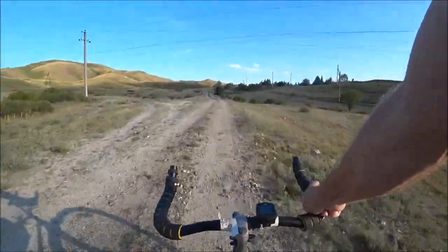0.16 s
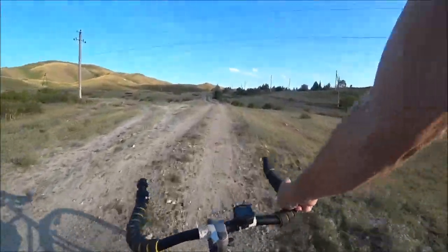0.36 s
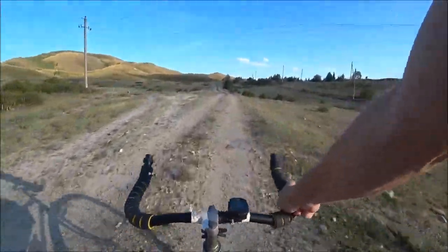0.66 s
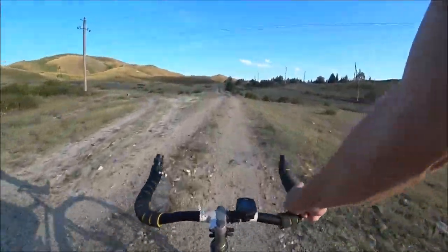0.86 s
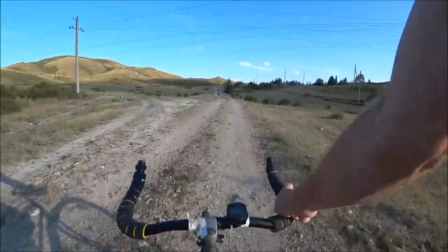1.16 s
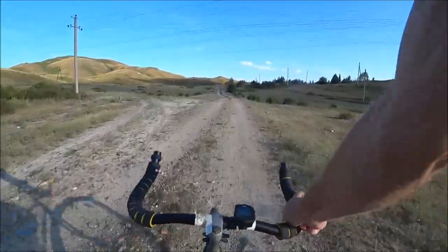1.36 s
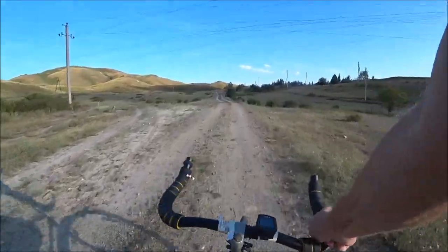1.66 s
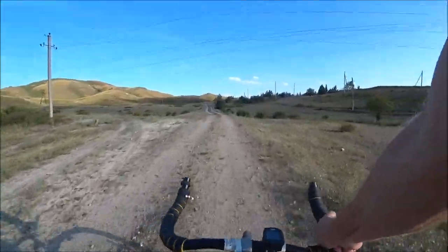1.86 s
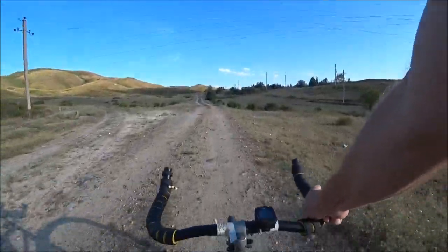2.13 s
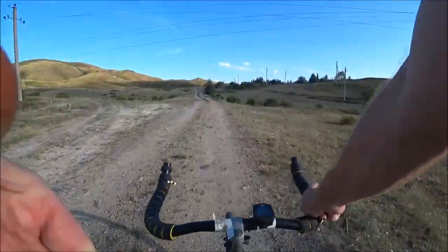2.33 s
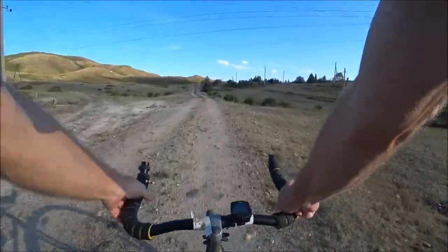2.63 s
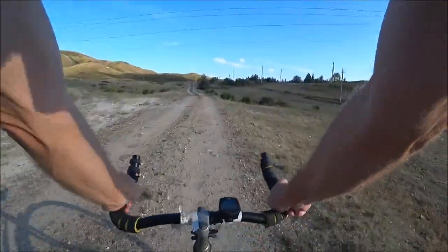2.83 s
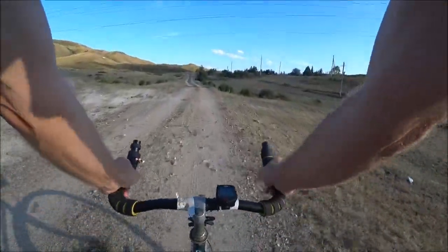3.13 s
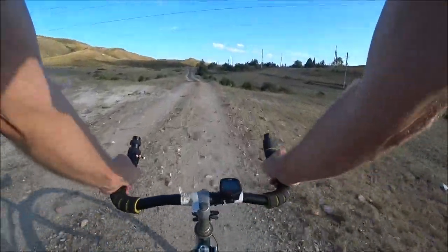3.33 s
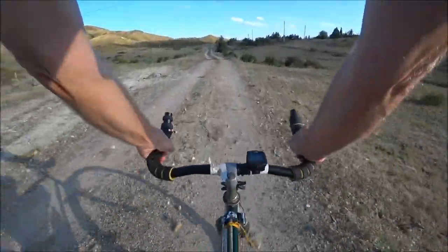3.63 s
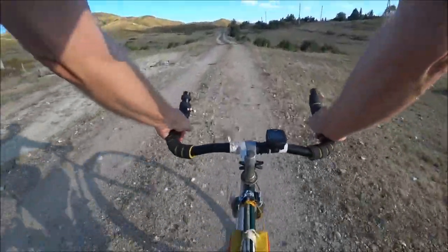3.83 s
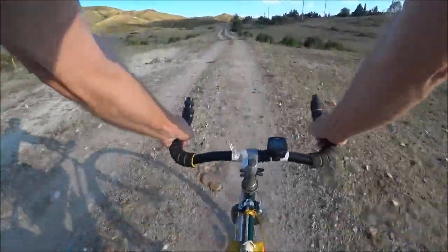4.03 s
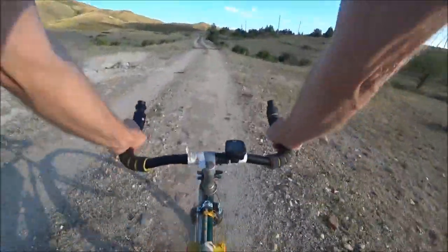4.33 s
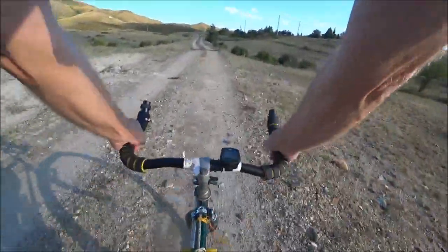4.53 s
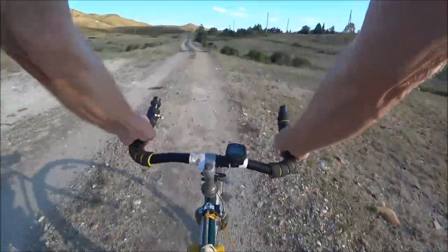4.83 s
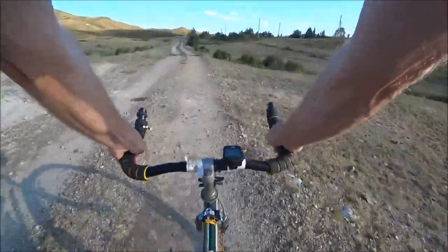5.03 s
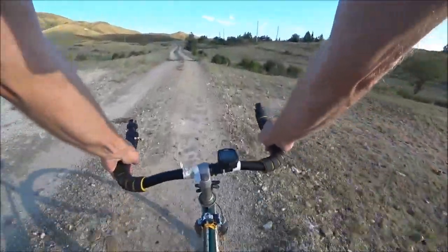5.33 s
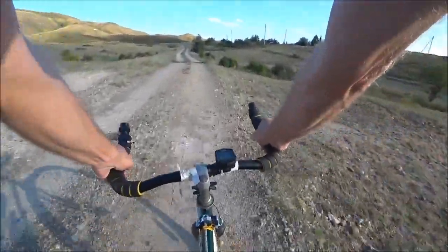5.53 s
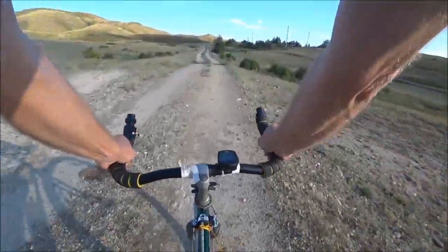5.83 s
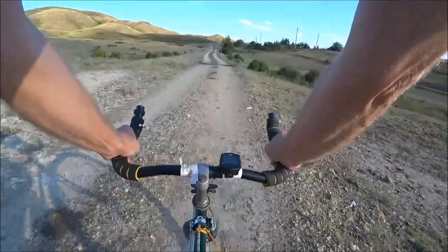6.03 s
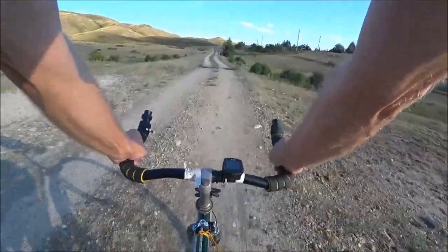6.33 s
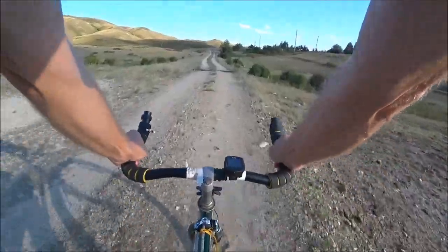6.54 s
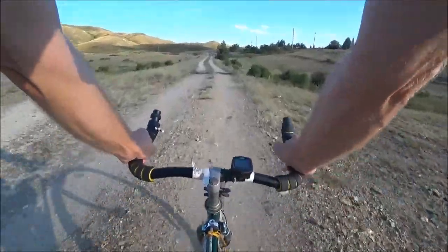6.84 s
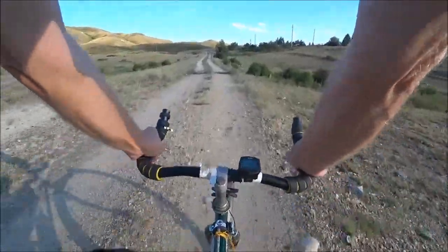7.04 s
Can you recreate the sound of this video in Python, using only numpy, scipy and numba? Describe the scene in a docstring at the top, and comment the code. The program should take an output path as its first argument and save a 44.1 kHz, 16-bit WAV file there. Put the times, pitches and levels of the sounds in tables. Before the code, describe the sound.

Bicycle tyres crunch slowly over a gravel track with sharp stone snaps and frame knocks, while wind gusts buffet the microphone harder later on.

```python
"""A slow bicycle on gravel

A bicycle rolls slowly along a gravel track, heard from a small two-port microphone on the rider's chest.
Stones crunch (filtered grains and hiss) and snap (short rings with a crack of noise) under the tyres.
Bumps knock through the frame (dying tones and noise), and short squeaks (rough tones) come and go.
Gusts of wind buffet the two ports (noise through moving low-passes, with pulses) over a deep rumble."""
import sys
import numpy as np
from scipy import signal
from scipy.fft import rfft, irfft, next_fast_len
from scipy.io import wavfile
from scipy.ndimage import uniform_filter1d
from numba import njit

SR = 44100
rng = np.random.default_rng(int(sys.argv[2]) if len(sys.argv) > 2 else 0)


def digitize_waveform(pressure):
    """Quantize a signal to 16-bit integers and store it at the path in sys.argv[1].

    Rows of a 2-D input are taken as channels; values are limited to [-1, 1].
    """
    field = np.atleast_2d(pressure).T
    bounded = np.clip(field, -1, 1)
    quanta = np.round(bounded * 32767).astype(np.int16)
    wavfile.write(sys.argv[1], SR, quanta)


N = 317072

# Colour of stones through the microphone housing: pitch_hz, gain_db (only the shape matters for the crunch)
STONE_COLOUR = [(88, -43.5), (150, 6.5), (232, -9.5), (322, 1.5), (400, -1.5), (689, -9), (1430, -8),
                (1740, -6), (2160, -8), (2410, -5), (3170, -0.5), (4720, -13.5), (6090, -14.5),
                (10500, -29.5), (11500, -27.5), (15000, -117), (22000, -120)]


def amp(db):
    """Turns decibels into a plain factor."""
    return 10 ** (np.asarray(db) / 20)


def rms_one(x):
    """Scales a signal to an average strength (RMS) of 1."""
    return x / np.sqrt(np.mean(x ** 2) + 1e-20)


def in_time(rows):
    """Draws straight lines between the rows of a table whose first column is time in seconds."""
    s, *columns = np.transpose(rows)
    return [np.interp(np.arange(N) / SR, s, c) for c in columns]


def drift(rate_hz):
    """Smooth chance with spread 1; its average over a tenth of a second is taken out."""
    # one value per 20 samples is enough; the first 2000 let the filter settle
    r = np.exp(-40 * np.pi * rate_hz / SR)
    noise = rng.standard_normal(N // 20 + 2002)
    smooth = signal.lfilter([1], [1, -2 * r, r * r], noise)[2000:]
    quick = smooth - uniform_filter1d(smooth, size=SR // 200)
    return np.interp(np.arange(N) / 20, np.arange(len(quick)), rms_one(quick))


def coloured(x, spectrum):
    """Filters with the given spectrum, without sounding ahead of time (minimum phase)."""
    hz, db = np.transpose(spectrum)
    grid = np.maximum(np.fft.rfftfreq(4096, 1 / SR), 1)
    gain = amp(np.interp(np.log(grid), np.log(hz), db))
    # folding the cepstrum forwards in time gives the minimum phase
    cepstrum = irfft(np.log(gain))
    cepstrum[1:2048] *= 2
    cepstrum[2049:] = 0
    response = irfft(np.exp(rfft(cepstrum)))[None, :2048]
    return signal.fftconvolve(x, response, axes=1)[:, :x.shape[1]]


def add(out, s, sound, pan_db):
    """Places a short sound between the channels; pan_db is left minus right."""
    i = round(s * SR)
    sound = sound[..., :N - i]
    out[:, i:i + sound.shape[-1]] += amp([[pan_db / 2], [-pan_db / 2]]) * sound


def gusts():
    """Each gust rises, holds and falls; the stronger weigh more in the eddy rate. Gives dB and Hz."""
    # Gusts on the ports: start_s (at full strength), hold_s, level_db, rate_hz (typical eddies)
    gust_table = [(0.035, 0.11, -37, 200), (0.745, 0.0069, -36, 130), (0.927, 0.0049, -37, 151),
                  (1.087, .01, -52, 400), (1.202, 0.004, -33, 100), (1.615, 0.066, -25.5, 180),
                  (1.816, 0.0075, -37, 178), (2.26, 0.0089, -42, 50), (3.24, 0.038, -39, 49.6),
                  (3.421, 0.0091, -33, 150), (3.469, 0.0054, -30, 150), (3.564, 0.0075, -31.5, 50),
                  (3.658, 0.064, -22, 134), (3.775, 0.065, -26, 116), (3.876, 0.065, -38.5, 70),
                  (3.986, 0.057, -27.5, 118), (4.092, 0.011, -20.5, 140), (4.287, .015, -30.5, 276),
                  (4.406, 0.011, -30, 70), (4.568, 0.01, -31, 52), (4.803, 0.11, -25.5, 153),
                  (4.956, 0.005, -17, 270), (5.086, 0.0084, -28.5, 256), (5.171, .01, -37, 59),
                  (5.321, 0.073, -32.5, 88), (5.493, 0.016, -30, 70), (5.662, 0.021, -21.5, 108),
                  (5.792, 0.0065, -18, 220), (5.844, 0.11, -27.5, 135), (6.093, 0.013, -33, 60.4),
                  (6.601, 0.0057, -24.5, 130), (6.67, 0.033, -29.5, 91.5), (6.786, .015, -39.5, 51),
                  (6.924, 0.02, -30.5, 102), (6.998, 0.018, -33, 49.7), (7.165, 0.025, -33.5, 130)]
    rise_db_per_s, fall_db_per_s = 558, 609
    calm_db, calm_rate_hz = -63, 70   # between gusts
    s, hold, db, hz = np.transpose(gust_table)[:, :, None]
    t = np.arange(0, N, 64) / SR
    rising_db = rise_db_per_s * np.maximum(s - t, 0)
    falling_db = fall_db_per_s * np.maximum(t - s - hold, 0)
    power, calm = amp(2 * (db - rising_db - falling_db)), amp(2 * calm_db)
    total = power.sum(axis=0) + calm
    rate_hz = (np.sum(power * hz, axis=0) + calm * calm_rate_hz) / total
    return in_time(np.transpose([t, 10 * np.log10(total), rate_hz]))


def rumble():
    """Deep pressure swells, nearly alike on both ports; what differs lies higher."""
    # Slow air pressure: time_s, level_db (before gusts and drift)
    pressure = [(0.0, -39.5), (0.44, -43), (1.16, -39), (1.26, -38), (1.46, -46), (1.68, -35.5),
                (2.02, -46), (2.2, -41), (2.72, -48), (3.46, -37.5), (3.62, -31), (3.9, -32), (4.56, -42),
                (4.83, -44), (4.95, -31.5), (5.65, -34), (5.85, -30.5), (6.03, -36), (6.15, -38),
                (6.39, -40), (6.75, -33), (7.19, -35.5)]
    # gusts also swell the rumble, averaged over this time
    swell_s, swell_db = .07, -5.5
    band = signal.butter(2, [24., 85.], "band", fs=SR, output="sos")
    deep = signal.sosfilt(band, rng.standard_normal((2, N)))
    gust_power = uniform_filter1d(amp(2 * gusts()[0]), size=max(round(swell_s * SR), 1))
    swell = amp(2 * swell_db) * gust_power
    level = np.sqrt(amp(2 * in_time(pressure)[0]) + np.abs(swell))
    mid, side = level * amp(2.6 * drift(6.7)) * rms_one(deep)
    side = 0.36 * signal.sosfilt(signal.butter(1, 60., "high", fs=SR, output="sos"), side)
    return np.array([mid + side, mid - side])


def pops(cycles=0.52):
    """Single eddies burst on a port: each is a pressure pulse of about half a cycle, mostly a push."""
    # Bursting eddies: middle_s, level_db (1.5 dB is added below), pitch_hz
    pop_table = [(1.205, -13, 150), (1.604, -15, 340), (3.421, -14, 210), (3.47, -11, 210),
                 (3.657, -11, 190), (3.674, -10, 330), (3.709, -14, 230), (3.721, -13, 260),
                 (3.782, -14, 210), (3.803, -9, 230), (3.988, -11, 220), (4.06, -13, 200), (4.1, -10, 180),
                 (4.805, -14, 230), (4.86, -12, 330), (4.883, -7, 300), (4.926, -8, 250), (4.952, -13, 340),
                 (4.964, -7, 240), (4.98, -12, 350), (5.084, -13, 300), (5.1, -6, 270), (5.651, -16, 190),
                 (5.667, -12, 250), (5.775, -16, 190), (5.792, -7, 400), (5.814, -14, 320),
                 (5.856, -12, 180), (5.883, -10, 200), (5.927, -14, 190), (6.6, -12, 200)]
    out, phases = np.zeros((1, N)), rng.normal(0, 1.3, len(pop_table))
    for (s, db, hz), phase in zip(pop_table, phases):
        turns = np.arange(-3 * SR // hz, 3 * SR // hz) * hz / SR
        i = round(s * SR + turns[0] * SR / hz)
        swell = np.exp(-(turns * 2 / cycles) ** 2)
        out[0, i:i + len(turns)] += amp(db + 1.5) * swell * np.cos(2 * np.pi * turns + phase)
    return out[0]


@njit
def eddies(noise, pole):
    """Four one-pole low-passes whose corner moves; power is kept level."""
    out, state = np.zeros_like(noise), np.zeros(4)
    for i in range(len(noise)):
        x = noise[i] / np.sqrt(pole[i])
        for k in range(4):
            state[k] += pole[i] * (x - state[k])
            x = state[k]
        out[i] = x
    return out


def wind(lumps_db=4., lee_db=-2.5, common_db=2.0, sum_hz=150., difference_hz=70.):
    """Each port has lumpy eddies; the bass of their sum and the top of their difference come through."""
    level_db, rate_hz = gusts()
    # the low-pass corner lies above the eddy rate
    pole = 1 - np.exp(-2 * np.pi * 3.05 * rate_hz / SR)
    ports = []
    for _ in range(2):
        roar = rms_one(eddies(rng.standard_normal(N), pole))
        ports.append(roar * amp(level_db + lumps_db * drift(46.0)))
    # one port faces the wind, the other is sheltered
    facing, sheltered = ports[0] + pops(), amp(lee_db) * ports[1]
    high = signal.butter(2, difference_hz, "high", fs=SR, output="sos")
    low = signal.butter(1, sum_hz, fs=SR, output="sos")
    side = signal.sosfilt(high, facing - sheltered)
    mid = amp(common_db) * signal.sosfilt(low, facing + sheltered)
    return np.array([mid + side, mid - side])


def squeaks():
    """Narrow whistles of a few milliseconds, made rough by a randomly wandering phase."""
    # Squeaks: start_s, peak_db (before panning), pitch_hz, length_s
    squeak_table = [(0.232, -33.5, 6770, 0.0085), (0.743, -32, 6700, 0.014), (1.064, -30.5, 6850, 0.0067),
                    (1.13, -34, 7100, 0.017), (3.359, -38, 6570, 0.016), (4.675, -31.5, 6730, 0.016),
                    (6.38, -36, 6460, 0.011), (6.432, -40, 6360, 0.013), (6.476, -32, 6200, 0.01),
                    (6.528, -33.5, 6770, 0.011), (6.566, -31, 6870, 0.01)]
    out = np.zeros((2, N))
    chance = rng.standard_normal((len(squeak_table), 2000))
    for (s, db, hz, length), noise in zip(squeak_table, chance):
        t = np.arange(min(round(length * SR), 2000)) / SR
        wobble = .14 * np.cumsum(noise[:len(t)])
        swell = np.sqrt(np.abs(np.sin(np.pi * t / length)))
        add(out, s, amp(db) * swell * np.sin(2 * np.pi * hz * t + wobble), pan_db=2.5)
    return out


def knocks():
    """A bump shakes the frame: a few cycles and noise in a broad resonance, dying quickly."""
    # Knocks: start_s, level_db (14 dB is added below), pitch_hz, t60_s (time to die by 60 dB)
    knock_table = [(0.612, -45.5, 408, 0.22), (0.643, -44, 340, 0.046), (0.735, -25.5, 411, 0.018),
                   (0.753, -38, 457, 0.031), (0.811, -45, 410, 0.03), (0.942, -41, 462, 0.063),
                   (0.979, -24, 447, 0.008), (1.027, -28, 1127, 0.048), (1.077, -20.5, 452, 0.023),
                   (1.091, -22, 257, 0.033), (1.112, -40, 472, 0.089), (1.342, -40, 320, 0.029),
                   (1.759, -28.5, 1030, 0.014), (2.687, -34.5, 330, 0.017), (2.77, -44.5, 392, 0.096),
                   (2.816, -33.5, 436, 0.015), (3.199, -33.5, 490, 0.013), (3.903, -37.5, 246, 0.07),
                   (4.067, -44.5, 474, 0.18), (4.168, -29, 430, 0.0095), (4.181, -27.5, 305, 0.018),
                   (4.265, -30, 382, 0.0089), (4.296, -24, 320, 0.029), (4.341, -37, 325, 0.028),
                   (4.379, -29.5, 430, 0.022), (4.52, -35.5, 397, 0.026), (4.546, -34.5, 410, 0.018),
                   (4.653, -36, 377, 0.017), (6.527, -40, 272, 0.098)]
    out, t = np.zeros((2, N)), np.arange(4000) / SR
    chance = rng.standard_normal((len(knock_table), 4000))
    for (s, db, hz, t60), noise in zip(knock_table, chance):
        band = signal.butter(2, [.6 * hz, 1.9 * hz], "band", fs=SR, output="sos")
        rise = 1 - np.exp(-t / .002)
        thud = np.sin(2 * np.pi * hz * t) + 0.97 * rms_one(signal.sosfilt(band, noise))
        add(out, s, amp(db + 14.0) * rise * thud * amp(-60 * t / t60), pan_db=3.0)
    return out


def snaps(t60=0.0063, rise_s=0.00023):
    """Each stone rings a few milliseconds at its pitch, with a burst of treble noise on top."""
    # Snapping stones: start_s, level_db (3.5 dB is added below), pitch_hz,
    # crack_db (treble, relative to level_db; a lift is added below), pan_db (left minus right)
    snap_table = [(0.2006, -16.5, 3270, -27, 0.0), (0.2945, -19, 3500, -6, 0.0),
                  (0.3296, -12.5, 3130, -31, 0.0), (0.383, -10, 3120, -37, 2),
                  (0.405, -10, 2980, -31, -0.5), (0.417, -16, 3270, -30, 0.5), (0.463, -17, 3200, -23, 0.0),
                  (0.4762, -15, 2330, -16, 3), (0.5084, -16, 2430, -2, -1.0), (0.5616, -13, 2450, -26, -2),
                  (0.606, -11.5, 3150, -32, -0.5), (0.6406, -12.5, 1500, -19, 3),
                  (0.7084, -16.5, 1800, -22, 3), (0.7253, -12, 3360, -13, 0.5),
                  (0.746, -15.5, 3200, -34, 0.0), (0.919, -14, 2350, -3, -1), (0.956, -15, 1950, -36, 0.5),
                  (0.961, -16, 3280, -69, -3), (1.0284, -21, 1430, -31, -10), (1.066, -16, 1760, -26, 0.5),
                  (1.0829, -13.5, 3230, -31, 1.5), (1.1194, -12.5, 3220, -16, 0.5),
                  (1.1835, -20, 3260, -11, 0.0), (1.3234, -16, 3300, -19, 0.5),
                  (1.37, -12.5, 3320, -26, -0.5), (1.5936, -9, 7500, -1.5, 3), (1.634, -17, 2410, -27, 0.5),
                  (1.644, -7, 2430, -44, 0), (1.736, -15.5, 1820, -46, 0.5), (1.7534, -19, 1920, -28, -0.5),
                  (1.7788, -13, 3480, -33, -2), (1.8062, -15, 3450, -13, -0.5),
                  (1.8257, -21, 3350, -37, -4), (1.8482, -14, 3300, -25, 0.0), (1.8665, -20, 3420, -42, -2),
                  (1.8817, -20, 3400, -37, 0.0), (1.897, -22, 3200, -30, 0.5),
                  (1.9914, -18, 3450, -32, 0.0), (2.0948, -17, 4980, -6, 12), (2.1168, -12, 7400, -3, -8),
                  (2.168, -17.5, 3040, -19, 0.0), (2.1995, -18, 3380, -28, 0.0),
                  (2.253, -15, 2260, -22, -0.5), (2.2587, -13.5, 2330, -32, -0.5),
                  (2.2714, -17, 3260, -19, -1.0), (2.2775, -15, 2360, -22, -1.0),
                  (2.2948, -15.5, 3340, -23, -1.5), (2.3012, -11, 3160, -17, -1.0),
                  (2.3523, -17, 3200, -25, -3), (2.5107, -22.5, 3300, -23, 20),
                  (2.5264, -5.5, 3040, -30, 0.0), (2.5397, -11.5, 3030, -34, -0.5),
                  (2.587, -16.5, 3220, -31, 0.0), (2.6284, -15, 3400, -19, 0.0),
                  (2.7143, -20.5, 3250, -21, -1), (2.7231, -16.5, 1650, -52, 1.0),
                  (2.818, -16, 2850, -42, 5), (2.8432, -15, 2780, -28, 1.0), (2.8944, -21, 3130, -24, 2),
                  (2.8993, -17, 3230, -24, 0.5), (2.9443, -19.5, 3190, -15, 14),
                  (2.9508, -14, 3350, -24, 0.5), (2.9607, -7.5, 3090, -37, 0), (2.984, -15, 2980, -21, 5),
                  (2.997, -22, 3310, -26, -0.5), (3.0031, -17.5, 3180, -26, 0.5),
                  (3.0527, -17.5, 2970, -18, 0.5), (3.1446, -15, 3100, -37, 1.5),
                  (3.1646, -11, 3040, -46, 0.0), (3.2017, -13, 3440, -42, 0.0),
                  (3.269, -25, 3510, -20, -1.5), (3.284, -23, 3570, -28, -2), (3.462, -12, 3070, -16, -6),
                  (3.557, -16, 3200, -19, -5), (3.5924, -20, 3100, -14, -3), (3.729, -29, 3280, -4, -3),
                  (3.7599, -18.5, 2820, -32, -1.5), (3.9342, -20, 3170, -47, -4),
                  (3.9718, -19, 2840, -29, -3), (4.2833, -16, 3170, -16, -2), (4.2974, -41, 1400, -18, -6),
                  (4.361, -19, 3360, -25, -2), (4.3896, -18, 3000, -9, 3), (4.489, -17.5, 4800, -11, 0.5),
                  (4.6537, -24.5, 3520, -3, -3), (4.6894, -22, 1760, -27, 0.5),
                  (4.7083, -10.5, 2820, -15, -3), (4.769, -14, 3260, -14, 0.0),
                  (4.777, -11, 3270, -18, -0.5), (4.9305, -12.5, 3270, -41, 3),
                  (5.0124, -20.5, 3220, -18, 4), (5.254, -25, 1990, -15, 4), (5.5196, -20.5, 3170, -14, -7),
                  (5.675, -16.5, 3470, -25, -3), (5.7174, -22, 2970, -25, 0.0),
                  (5.7785, -24, 2890, -5.5, 4), (5.874, -19, 3500, -26, 2), (5.903, -25, 3250, -17, -1.0),
                  (5.9717, -18, 3320, -22, 1.0), (6.003, -20.5, 3500, -23, 4), (6.128, -17, 3780, -13, -1),
                  (6.4918, -22.5, 3300, -17, -5), (6.5268, -30, 3060, -5, 0.0),
                  (7.016, -16.5, 3460, -11, 0), (7.0908, -18, 3050, -20, -0.5)]
    crack_s, crack_lift_db = .0007, 2
    out, t = np.zeros((2, N)), np.arange(900) / SR
    treble = signal.butter(2, 4500, "high", fs=SR, output="sos")
    chance = rng.standard_normal((len(snap_table), 3, 900))
    chips = coloured(chance[:, 0], STONE_COLOUR)
    rise = 1 - np.exp(-t / rise_s)
    for (s, db, hz, crack_db, pan_db), noise, chip in zip(snap_table, chance, chips):
        # the pitch starts a little low
        tone = np.sin(2 * np.pi * hz * t + 0.26 * np.exp(-t / 0.00044)) * amp(-60 * t / t60)
        # the crack is a little unlike on the two ports
        crack = signal.sosfilt(treble, (noise[0] + 0.68 * noise[1:]) * np.exp(-t / crack_s))
        # chips scatter after the snap
        scatter = amp(-12) * rms_one(chip) * np.exp(-t / 0.0025)
        # the brighter the snap, the less it rings
        ringing = 1 - 0.64 * min(amp(crack_db), 1)
        # the ring stays near its pitch
        near_pitch = signal.butter(2, [0.5 * hz, 2.25 * hz], "band", fs=SR, output="sos")
        body = signal.sosfilt(near_pitch, rise * ringing * (tone + scatter))
        bright = rise * amp(crack_db + crack_lift_db) * crack
        add(out, s, amp(db + 3.5) * (body + bright), pan_db)
    return out


def patches(hz):
    """Lift in dB of the band at hz: loose stones crunch harder, packed earth runs softer."""
    # Patches of ground: middle_s, length_s, lift_db (at the middle and centre pitch), centre_hz
    patch_table = [(0.307, 0.13, 4.5, 3040), (0.473, 0.049, 12, 2800), (0.509, 0.035, 17, 7100),
                   (0.552, .04, 3, 3200), (0.61, 0.13, 6, 2500), (.67, 0.064, -8, 3000),
                   (0.729, 0.075, 11, 2670), (0.949, 0.05, 9, 3200), (0.909, 0.03, -8, 2500),
                   (0.997, 0.026, 7.5, 3000), (1.056, 0.3, 12.5, 875), (1.306, 0.029, -8, 3000),
                   (1.12, 0.27, 4.5, 7000), (1.33, 0.03, 12, 2900), (1.763, 0.16, 5.5, 3000),
                   (1.597, .05, 2, 8000), (2.111, 0.17, 12, 7660), (1.886, 0.14, 2.5, 3300),
                   (2.036, .06, -2.5, 3500), (2.195, 0.11, 5, 2980), (2.297, 0.062, 14, 2400),
                   (2.44, 0.055, 2.5, 3200), (2.615, 0.022, -7, 4000), (2.632, 0.035, 14, 3180),
                   (2.867, 0.03, 12, 3200), (2.965, 0.041, 6.5, 2960), (3.456, 0.044, 6, 3500),
                   (3.616, .1, 5.5, 3920), (3.726, 0.023, 8, 6000), (3.93, 0.19, 4, 3180),
                   (4.07, 0.12, 4.5, 3000), (4.168, 0.033, 7.5, 4500), (3.845, 0.075, -7, 3000),
                   (4.212, 0.043, -7, 2970), (4.304, 0.057, 11.5, 1200), (4.347, 0.21, 4.5, 6000),
                   (4.484, 0.069, 0, 6060), (4.66, 0.039, 7, 8000), (4.716, .07, 8, 8050),
                   (5.05, 0.33, 4.5, 3250), (5.273, 0.055, -10, 3000), (5.527, 0.18, 3, 3000),
                   (5.885, 0.067, 7.5, 3480), (6.163, 0.11, 7, 3220), (6.325, 0.097, -2, 3000),
                   (6.498, 0.16, 7.5, 3100), (6.533, 0.078, 11, 900), (6.62, 0.039, 9, 3200)]
    spread_octaves = 1   # how far a lift reaches around its centre
    s, length, lift_db, centre_hz = np.transpose(patch_table)[:, :, None]
    t = np.arange(0, N, 64) / SR
    crossing = np.clip(1 - np.abs(t - s) / length * 2, 0, 1)
    nearness = np.exp(-(np.log2(hz / centre_hz) / spread_octaves) ** 2)
    return np.interp(np.arange(N) / SR, t, np.sum(lift_db * crossing * nearness, axis=0))


def gravel(per_s=2500., size_db=3.0, hiss_db=-1.0, width=0.29, clump_db=1.0, side_db=-19.5):
    """Grains of many sizes over a rolling hiss; each grain rings in one band, clumps come and go."""
    # Tyres on gravel: time_s, crunch_db (3.5 dB is added below),
    # dull_db (tilt, full at 750 Hz and below), bright_db (tilt, full at 6000 Hz and above)
    roll_table = [(0.0, -34.5, 4, 3), (0.26, -39, 5, 4), (0.4, -36, 1.5, 3), (1.28, -35.5, 0.5, 5),
                  (1.58, -37.5, 0.5, 1.5), (1.74, -36, -1, 2), (2.58, -40, 1.5, 3), (2.88, -37.5, 0.5, 4.5),
                  (3.0, -35.5, 0, 1.5), (3.76, -40.5, -1, 5.5), (4.14, -39, 6, 9.5), (5.39, -41, -5.5, 5),
                  (5.73, -38, -9, 5.5), (6.17, -45, 3, 9.5), (7.09, -45.5, 2.5, 10),
                  (7.19, -46.5, 1.5, 13.5)]
    crunch_db, dull_db, bright_db = in_time(roll_table)
    clumps = drift(25.)
    born = rng.random(N) < per_s * amp(2.2 * clumps) / SR
    sizes = amp(size_db * np.minimum(rng.exponential(1, N), 4))
    grains = born * sizes * rng.choice([-1, 1], N)
    # row 0 is common to both ports (mid), row 1 is their difference (side)
    grains = rms_one(grains) * np.array([np.ones(N), amp(side_db) * rng.standard_normal(N)])
    hiss = amp(hiss_db) * rng.standard_normal((2, 2, N)) * amp([[0], [side_db]])
    centres, dealt, out = np.geomspace(220, 10000, 16), rng.integers(0, 16, N), 0
    for k, hz in enumerate(centres):
        band = signal.butter(2, [hz * (1 - width / 2), hz * (1 + width / 2)], "band", fs=SR, output="sos")
        octaves = np.log2(hz / 3000)
        tilt_db = np.clip(-octaves / 2, 0, 1) * dull_db + np.clip(octaves, 0, 1) * bright_db
        gain = amp(tilt_db + patches(hz) + clump_db * (clumps + 2.04 * drift(12.3)))
        # treble arrives from wider angles
        gain = gain * amp([[0], [9.3 * np.clip(octaves + 0.1, 0, 1)]])
        # grains stand out less from the hiss in the treble
        grain_gain = amp(12 - 5 * np.clip(octaves, 0, 1))
        # neighbouring bands use different hiss
        out = out + gain * signal.sosfilt(band, hiss[k % 2] + grain_gain * grains * (dealt == k))
    mid, side = coloured(out, STONE_COLOUR)
    gain = amp(crunch_db + 3.5) / np.std(mid)
    return gain * np.array([mid + side, mid - side])


def scene():
    """Adds the bicycle sounds, the wind and the rumble."""
    bike = gravel() + snaps() + knocks() + squeaks()
    # the port pair turns the phase: left leads by a like angle at all pitches
    turned = 0.32 * signal.hilbert(bike.mean(axis=0), next_fast_len(N)).imag[:N]
    return bike + [-turned, turned] + wind() + rumble()


def record(dry):
    """Peaks are rounded; the treble steps down, then the top is cut."""
    step_hz, cutoff_hz = 11200, 12200
    step = signal.cheby2(18, 30, step_hz, fs=SR, output="sos")   # down by 30 dB
    cut = signal.butter(12, cutoff_hz, fs=SR, output="sos")
    rounded = .9 * np.tanh(dry / .9)
    return signal.sosfilt(np.r_[step, cut], rounded)


dry = scene()
out = record(dry)
digitize_waveform(out)
```